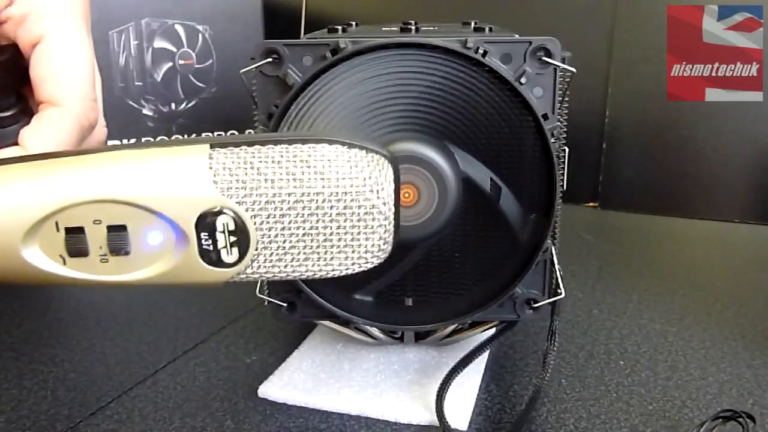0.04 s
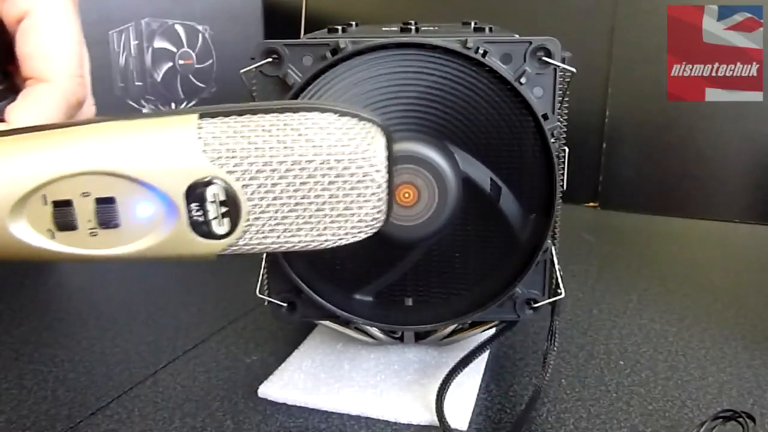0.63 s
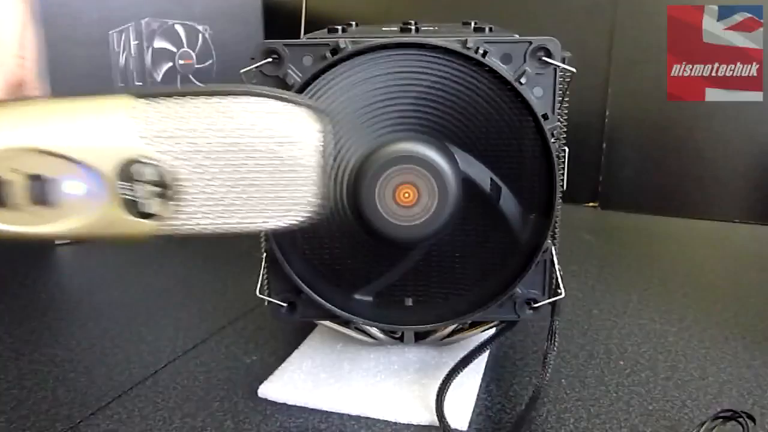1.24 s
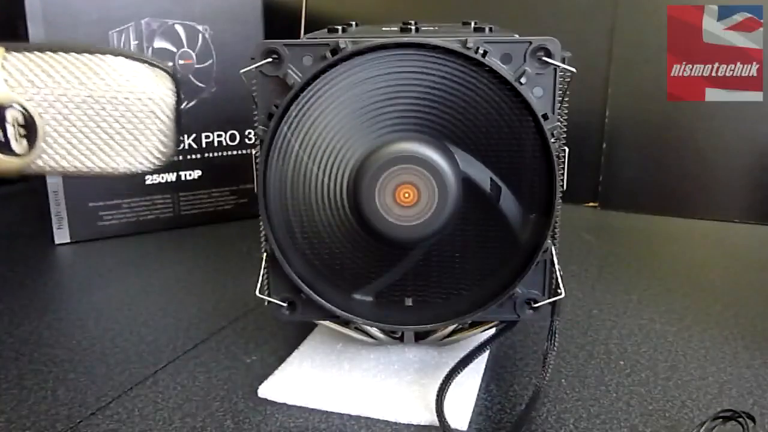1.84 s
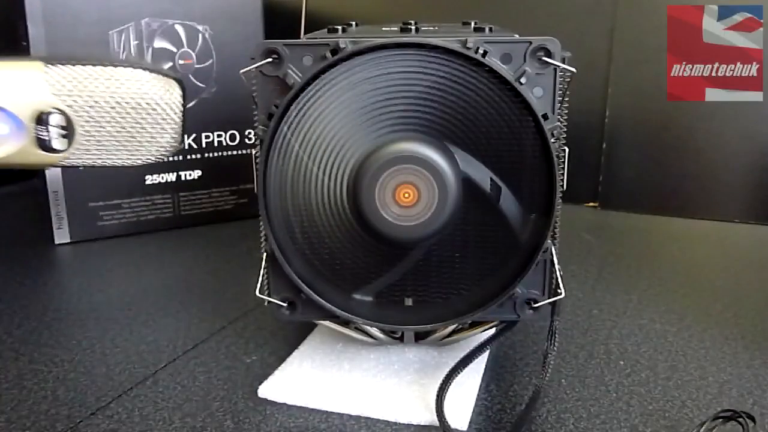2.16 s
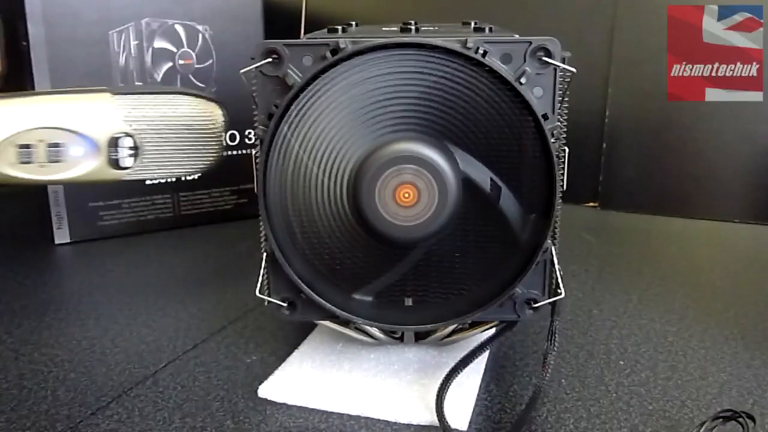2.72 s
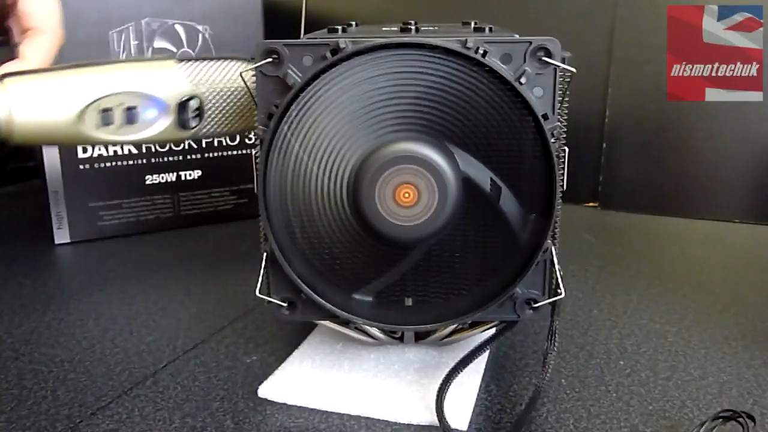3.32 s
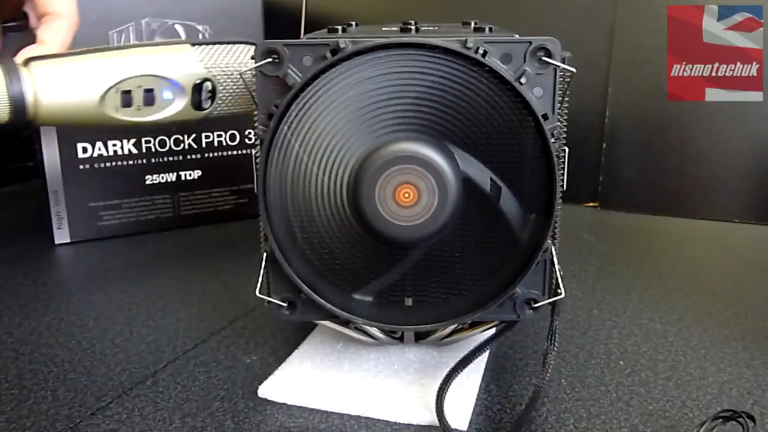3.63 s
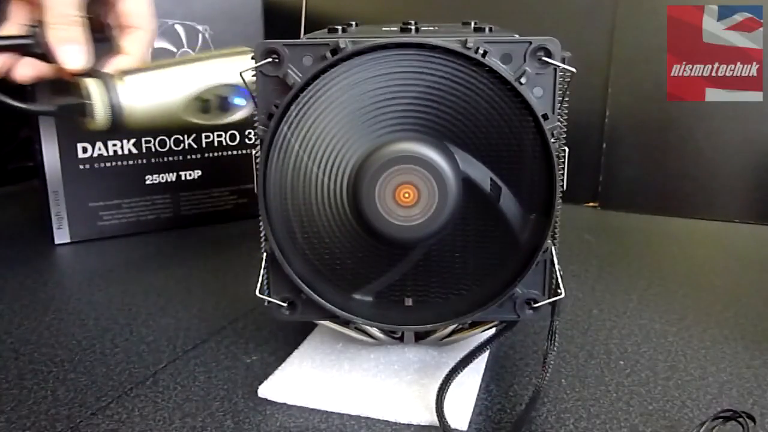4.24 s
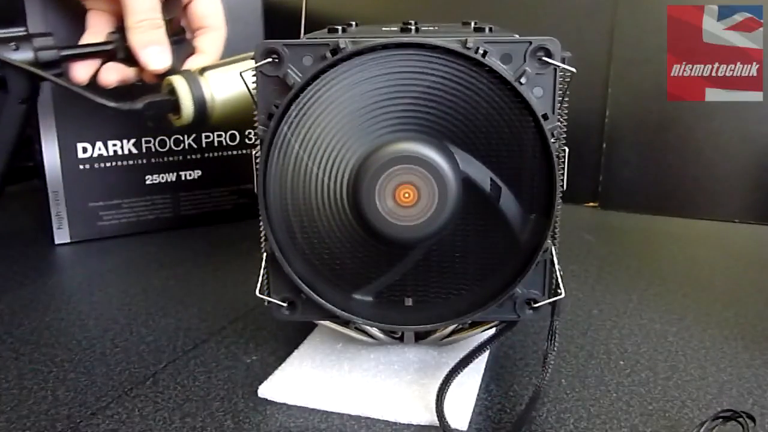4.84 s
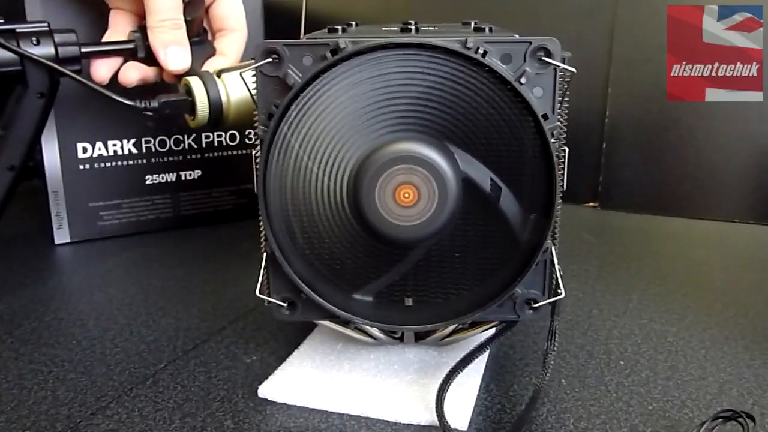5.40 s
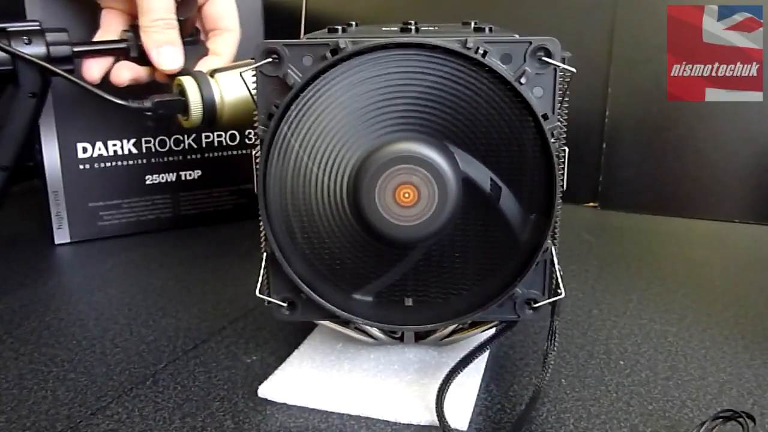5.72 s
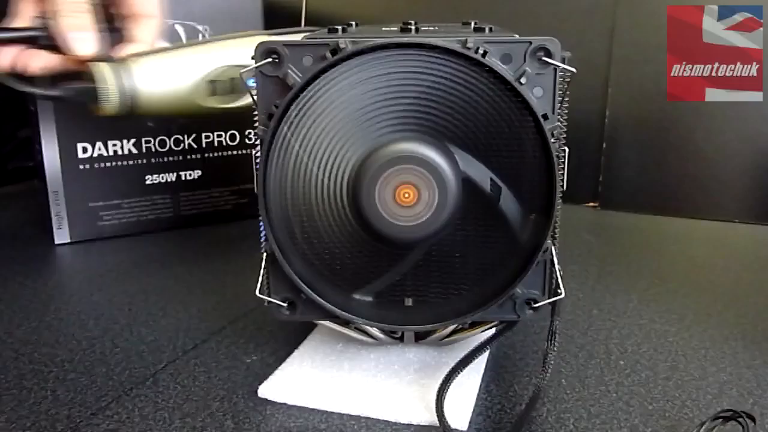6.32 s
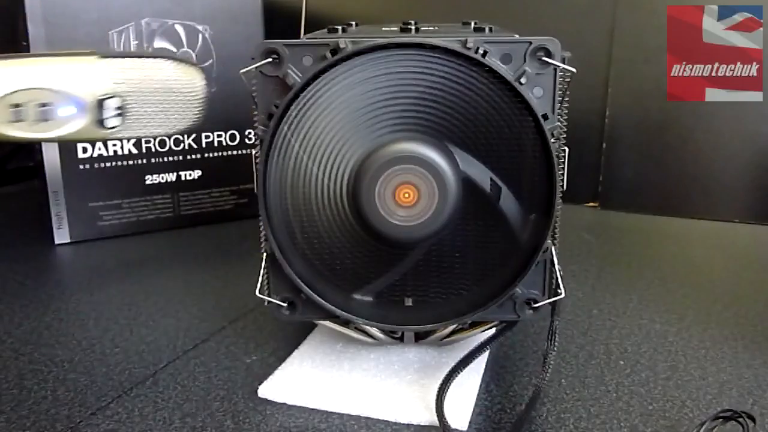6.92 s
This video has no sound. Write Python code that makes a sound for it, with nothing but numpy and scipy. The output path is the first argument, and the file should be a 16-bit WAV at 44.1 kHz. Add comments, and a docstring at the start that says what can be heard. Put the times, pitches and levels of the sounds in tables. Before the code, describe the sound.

Two computer fans spin at full speed on a cooler indoors, making a steady low hum with a soft rush of air. A close hand-held microphone moves from the front to the side, and the hum swells briefly, then recedes. Escaping air starts buffeting the microphone with a deep, gusty rumble that becomes the loudest sound. Faint high electronic whine and thin whistles from the microphone grille sit behind it.

```python
"""Two fans on a tower cooler hum at full speed as their blades chop the air.
Air swirls at the blades and rushes through the fins. A hand-held microphone moves from the
front fan round to the side, where escaping air buffets it and whistles in its wire grille.
Behind this are the faint whines of the motors, their drive and a power supply,
one tiny handling tick and a steady hiss."""
import sys
import numpy as np
from scipy.fft import rfft, irfft, next_fast_len
from scipy.io import wavfile
from scipy.ndimage import uniform_filter1d, map_coordinates

SR = 44100
rng = np.random.default_rng(int(sys.argv[2]) if len(sys.argv) > 2 else 0)


def file_out(sig):
    """Save sig as 16-bit WAV at sys.argv[1]."""
    # one column per channel
    cols = np.atleast_2d(sig).T
    # limit, then scale
    lim = np.clip(cols, -1, 1)
    pcm = np.round(lim * 32767).astype(np.int16)
    wavfile.write(sys.argv[1], SR, pcm)


N = 306611

# The front fan's hum, fading as the microphone leaves its face: time_s, level_db
FRONT_HUM = [(0, -31.5), (.55, -36.5), (1.05, -32.5), (1.5, -23.5), (1.8, -31), (2.15, -36.5), (2.45, -50),
             (4, -50.5), (6.95, -51.5)]
# Dead spots, where direct and reflected hum cancel: middle_s, length_s, change_db
FRONT_DEAD_SPOTS = [(1.94, 0.15, -14)]
# The rise and fall that both overtones follow: time_s, level_db
FRONT_OVERTONES = [(0, -43), (1, -43), (1.25, -40), (1.6, -43), (1.8, -60.5), (6.95, -66)]
# Low tones of the spinning rotor: cycles_per_turn, relative_db
ROTOR_TONES = [(1, -16), (2, -14.5), (3, -11.5), (4, -16), (5, -26.5), (6, -28)]
# How strongly the air stirs at the blades: time_s, level_db
BLADE_AIR = [(0, -45.5), (1, -45.5), (1.35, -42.5), (1.7, -51.5), (2.3, -52.5), (2.95, -48.5),
             (3.65, -47.5), (4.1, -53.5), (6.95, -51.5)]
# Tone colour of that swirling air: pitch_hz, relative_db
SWIRL_COLOUR = [(15, 1), (60, -5), (160, 1.5), (230, -4.5), (300, -8), (370, -7.5), (450, -13.5),
                (550, -12.5), (650, -15), (900, -22.5), (1300, -22), (1700, -34.5), (3000, -40),
                (8000, -77)]

def front_fan(turns_hz=26.9, blades=7):
    """Blades chop uneven air, so their hum flutters; close up, each turn of the rotor is felt too."""
    hum_db = curve(FRONT_HUM) + swells(FRONT_DEAD_SPOTS)
    overtone_db, air_db = curve(FRONT_OVERTONES), curve(BLADE_AIR)
    shaft = turning(turns_hz * (1 + 0.0012 * wobble(1.95)))
    blade = blades * shaft
    hum = amp(hum_db - 1.4 + 0.67 * wobble(30)) * tone(blade + 0.13 * wobble(35))
    throb_db = 2 * np.cos(2 * np.pi * seconds_since(1.206) / 0.21)  # one throb every 0.21 s
    # Several blades in a row cut each eddy (a small whirl of air), which smears the overtones.
    second = amp(overtone_db - 3 + throb_db + 2.4 * wobble(25)) * tone(2 * blade + 0.6 * wobble(35))
    third = amp(overtone_db - 13.5 + 1.3 * wobble(22)) * tone(3 * blade + 2.7 * wobble(25))
    rotor = amp(air_db + 13.5) * shaft_tones(shaft, ROTOR_TONES)
    swirl = amp(air_db + 8.5) * noise(SWIRL_COLOUR)
    return hum + second + third + rotor + swirl


# The rear fan's hum: time_s, level_db
REAR_HUM = [(0, -42), (.45, -39), (1.2, -42.5), (2.3, -39.5), (2.9, -33), (4.1, -39.5), (5.6, -34.5),
            (6.5, -37.5), (6.95, -43.5)]
# Dead spots in that hum: middle_s, length_s, change_db
REAR_DEAD_SPOTS = [(1.75, 0.65, -15), (3.33, 0.29, -10.5), (3.68, 0.35, -10), (6.92, 0.33, -10)]
# The tone of its nine blades, and overtones: cycles_per_turn, relative_db
REAR_TONES = [(9, 0.5), (18, -19), (27, -28), (36, -31.5)]
# Its motor's tone swells at the cooler's side: middle_s, length_s, boost_db
COGGING_SWELL = [(3.15, 0.84, 12.5)]

def rear_fan(turns_hz=22.91):
    """The slower fan hums, and its motor's magnets tug twelve times a turn (called cogging)."""
    hum_db = curve(REAR_HUM) + swells(REAR_DEAD_SPOTS)
    shaft = turning(turns_hz * (1 + 0.00046 * wobble(2.01)))
    hum = amp(hum_db + 0.55 * wobble(12)) * shaft_tones(shaft, REAR_TONES)
    cogging = amp(-60 + swells(COGGING_SWELL)) * tone(12 * shaft)
    return hum + cogging


# Air through the fins, louder beside the cooler: time_s, level_db
FIN_AIR = [(0, -58.5), (1.6, -59), (2.3, -53.5), (3.6, -49.2), (5.5, -47), (6.7, -48.2), (6.95, -52)]
# Tone colour of that air: pitch_hz, relative_db
FIN_COLOUR = [(100, -7), (300, -3), (550, 1), (950, 1.5), (1120, -2.5), (1700, -0.5), (2300, -5.5),
              (3000, -10), (3700, -13.5), (4500, -17.5), (5500, -23.5), (7500, -29.5), (10000, -38),
              (16000, -43)]
# Tones heard through the fins: pitch_hz, relative_db
LEAKING_TONES = [(618.6, -14), (700, -18.5), (824.8, -16), (959, -22.5), (1856, -18)]

def fin_rush():
    """The rear fan drives air through the fins, and its high overtones leak out with that air."""
    overtones = sum(amp(db + 2.1 * wobble(3.5)) * tone(turning(hz * (1 + 0.000712 * wobble(6))))
                    for hz, db in LEAKING_TONES)
    rush = amp(4.5 + 0.39 * wobble(14)) * noise(FIN_COLOUR)
    return amp(curve(FIN_AIR)) * (rush + overtones)


# Wind on the microphone, strongest at the cooler's side: time_s, level_db
WIND = [(0, -44), (1.3, -37.5), (1.8, -41.5), (2.5, -38.5), (2.85, -24), (3.35, -29.5), (4.05, -23),
        (4.7, -21.5), (5.3, -17), (6.1, -22), (6.75, -20.5), (6.95, -27)]
# Tone colours of large and of small eddies: pitch_hz, relative_db
LARGE_EDDY_COLOUR = [(5, -21), (12, 1.5), (30, 4.5), (50, 2.5), (70, -8.5), (100, -20), (150, -35.5),
                     (220, -54), (400, -81), (1500, -140)]
SMALL_EDDY_COLOUR = [(20, -21), (50, 8), (75, 1), (100, -0.5), (130, -10.5), (170, -21), (240, -23),
                     (400, -50.5), (900, -77), (3000, -140)]

def draught():
    """Eddies push on the microphone: small ones at the intake, mostly large ones in the escaping air."""
    steady = amp(curve(WIND) + 0.4 * wobble(19))
    intake = amp(curve(BLADE_AIR) + 5.5) * (1 - past_rim(middle_s=1.8, length_s=0.3))
    quick = np.hypot(intake, amp(-13.5) * steady)
    return steady * eddies(LARGE_EDDY_COLOUR) + quick * eddies(SMALL_EDDY_COLOUR)


# Gusts in the escaping air: middle_s, length_s, level_db, pitch_ratio
WIND_GUSTS = [(2.982, 0.14, -30, 1.54), (3.58, 0.346, -22.5, 1.85), (3.806, 0.26, -16, 1.19),
              (4.413, 0.11, -19.5, 1.55), (4.982, 0.21, -15, 0.91), (5.232, 0.23, -14.5, 1.26),
              (5.517, .16, -10.5, 1.18), (5.818, 0.1, -13.5, 1.07), (6.35, 0.19, -15.5, 1.01),
              (6.66, 0.22, -25, 1.9)]

def gust(middle_s, length_s, level_db, pitch_ratio):
    """One swell of wind; faster air carries its eddies past sooner, so they sound higher."""
    colour = [(hz * pitch_ratio, db) for hz, db in LARGE_EDDY_COLOUR]
    return swells([(middle_s, length_s, amp(level_db))]) * eddies(colour)


# Grille whistles: middle_s, length_s, pitch_hz, glide_hz_per_s, level_db, tremble_share
GRILLE_WHISTLES = [(3.3, .11, 8080, -600, -70, 0.0046), (3.49, .12, 8020, -300, -68, .003),
                   (3.62, .1, 8000, 2201, -70, .003), (3.69, .08, 6570, 3998, -71, .008),
                   (6.571, 0.17, 7930, 901, -58.5, 0.0027), (6.733, .25, 8000, -400, -67, .004),
                   (6.78, 0.4, 6550, -1500, -72, .016), (6.93, .1, 7930, -500, -69, .005)]

def whistle(middle_s, length_s, pitch_hz, glide_hz_per_s, level_db, tremble_share):
    """Whirls of air peel off the grille's wires in a thin, trembling tone that goes flat as it weakens."""
    fade_s, sag_hz = 0.049, 109.3
    t = seconds_since(middle_s)
    blow = np.clip((length_s / 2 - np.abs(t)) / fade_s + 0.34, 0, 1)
    hz = pitch_hz + glide_hz_per_s * np.clip(t, -length_s, length_s) + sag_hz * (blow - 1)
    gain = blow * amp(level_db + 2 * wobble(70))
    return gain * tone(turning(hz * (1 + tremble_share * wobble(300))))


# Moments when the air grazes the grille: middle_s, length_s, level_db
GRILLE_GRAZES = [(4.76, .36, -67.5), (5.25, 0.51, -61), (6.8, 0.48, -65.5)]
# Tone colour of the grille's hiss: pitch_hz, relative_db
GRILLE_COLOUR = [(3500, -27), (5600, -5), (6400, 1), (7000, -3), (7900, -4.5), (8600, -12), (9300, -10),
                 (10200, -12), (16000, -29)]

def grille_hiss():
    """The jet of air hisses as it brushes the wire mesh."""
    gain = swells([(middle_s, length_s, amp(db)) for middle_s, length_s, db in GRILLE_GRAZES])
    return gain * noise(GRILLE_COLOUR)


# The motor drive's whine: time_s, level_db
DRIVE_LEVEL = [(0, -71), (2.2, -74.5), (3.9, -70), (4.5, -63.5), (5.3, -60), (6.05, -61), (6.3, -67.5),
               (6.95, -71)]
# Loud spots, where its echoes add up: middle_s, length_s, boost_db
DRIVE_LOUD_SPOTS = [(.56, .42, 6), (1.89, 0.32, 13), (2.77, 0.058, 7), (3.3, .1, 5), (4.2, .18, 7),
                    (4.63, .16, 5.5), (5.03, 0.26, 5), (6.4, .17, 6.5)]
# Its tones, in steps of the switching rate: steps_from_centre, front_db, side_db
DRIVE_TONES = [(-4, -21, -11), (-2, -16, -11), (-1, -17, -5.5), (0, 3.5, -2), (1, -8, -5.5), (38, -22, -22)]

def drive_whine(centre_hz=11063, switching_hz=103.1):
    """Switching the motor's coils adds tones around the drive's whine; echoes make each one flicker."""
    whine_db = curve(DRIVE_LEVEL) + swells(DRIVE_LOUD_SPOTS)
    beside = curve([(0, 0), (4.2, 0), (5.1, 0.7), (5.4, 1), (6.1, 1), (6.35, 0)])  # 1 = side balance
    echo_gain = 0.39 * (1 - 0.6 * beside)
    centre, switching = turning(centre_hz + 4 * wobble(12)), turning(switching_hz)
    tones = np.zeros(N)
    for steps, front_db, side_db in DRIVE_TONES:
        phase = centre + round(steps) * switching + 0.73 * echo_drift()
        echo = wobble(24) * tone(phase) + wobble(32) * tone(phase + np.pi / 2)
        tones += amp(front_db + beside * (side_db - front_db)) * (tone(phase) + echo_gain * echo)
    return amp(whine_db - 4) * tones


# The motor's ringing tones: pitch_hz, level_db
MOTOR_TONES = [(2267, -74), (2475, -70), (2503, -66.5), (2528, -71), (2680, -72)]

def motor_ring():
    """Thin, wavering motor tones escape sideways, heard once the microphone is past the fan's rim."""
    tones = sum(amp(db + 2.3 * wobble(14)) * tone(turning(hz * (1 + 0.00304 * wobble(60))))
                for hz, db in MOTOR_TONES)
    return past_rim(middle_s=2.05, length_s=0.36) * tones


# The supply's sizzle, partly blocked by the cooler's corner: time_s, level_db
SIZZLE_LEVEL = [(0, -67), (2, -68), (2.5, -71), (3.9, -73), (4.4, -68.5), (6, -70), (6.95, -72)]
# Tone colour of that sizzle: pitch_hz, relative_db
SIZZLE_COLOUR = [(10900, 1.5), (11400, 0), (12300, -1.5), (12850, 0.5), (13100, -2.5)]

def power_supply(mains_hz=50.05):
    """Mains ripple sweeps the supply's high tone up and down; echoes off desk and walls add and cancel."""
    ripple = np.abs(np.sin(turning(mains_hz)))
    sweep = tone(turning(10950 + 2130 * ripple + 2.5 * wobble(7)))
    delays = rng.integers(0, SR // 100, size=7)  # seven paths, up to 10 ms late
    strengths = np.array([echo_drift() for _ in delays])
    shares = strengths / np.linalg.norm(strengths, axis=0)
    echoes = sum(share * np.roll(sweep, delay) for share, delay in zip(shares, delays))
    sizzle = filtered(echoes, lambda hz: amp(np.interp(hz, *np.transpose(SIZZLE_COLOUR))))
    return amp(curve(SIZZLE_LEVEL)) * unit(sizzle)


# Speed of the hand, which slows in front and at the side: time_s, echo_spots_per_s
HAND_SPEED = [(0, 2.5), (.9, 2.2), (1.4, 10), (2.8, 10.5), (5, 3), (5.9, 2.5), (6.5, 10)]

def echo_drift():
    """An echo changes at random as the microphone is carried through loud and quiet spots."""
    travel = np.cumsum(np.clip(curve(HAND_SPEED), 0, 20)) / SR
    return map_coordinates(rng.standard_normal(160), [travel])


def handling_tick(start_s, peak_db, pitch_hz, width_hz, decay_s):
    """One tiny bright tick as the microphone is turned in the hand."""
    age = np.maximum(seconds_since(start_s), 0)
    burst = rng.standard_normal(N) * (age > 0) * amp(-60 * age / decay_s)
    ring = filtered(burst, lambda hz: 1j * hz * width_hz / (pitch_hz**2 - hz**2 + 1j * hz * width_hz))
    return amp(peak_db) * ring / np.abs(ring).max()


# Tone colour of the background hiss: pitch_hz, relative_db
HISS_COLOUR = [(20, -3), (7500, 2.5), (9000, -2), (12500, 5), (14000, -7), (15200, 2), (16000, 1)]

def background_hiss():
    """A faint, steady hiss lies under everything."""
    return amp(-67) * noise(HISS_COLOUR)


def amp(db):
    """Turn decibels into a gain."""
    return 10 ** (np.asarray(db) / 20)


def unit(x):
    """Scale to an average strength (rms) of 1."""
    return x / np.sqrt(np.mean(x ** 2) + 1e-20)


def seconds_since(start_s):
    """The time at each sample, counted from start_s."""
    return np.arange(N) / SR - start_s


def curve(rows):
    """Join (time_s, value) points with straight lines."""
    return np.interp(seconds_since(0), *np.transpose(rows))


def swells(rows):
    """Add up bell-shaped swells, each length_s wide at half its height."""
    return sum(height * 0.5 ** ((2 * seconds_since(middle_s) / length_s) ** 2)
               for middle_s, length_s, height in rows)


def past_rim(middle_s, length_s):
    """0 in front of the fan, 1 once the microphone has moved past its rim."""
    return np.clip(seconds_since(middle_s) / length_s + 0.5, 0, 1)


def wobble(rate):
    """A smooth curve through `rate` random values a second."""
    return map_coordinates(rng.standard_normal(int(N * rate / SR) + 4), [np.arange(N) * rate / SR])


def turning(hz):
    """The growing angle (phase) of something that cycles hz times a second."""
    return 2 * np.pi * (np.cumsum(hz * np.ones(N)) / SR + rng.random())


def tone(phase):
    """A pure tone of strength 1."""
    return np.sqrt(2) * np.sin(phase)


def shaft_tones(shaft, rows):
    """Tones that cycle a whole number of times in each turn of a shaft."""
    return sum(amp(db) * tone(round(cycles) * shaft + 2 * np.pi * rng.random()) for cycles, db in rows)


def filtered(x, response):
    """Scale each frequency in x by response(hz)."""
    size = next_fast_len(N + SR // 2)
    return irfft(rfft(x, size) * response(np.fft.rfftfreq(size, 1 / SR)), size)[:N]


def noise(colour):
    """Noise of strength 1, shaped by (pitch_hz, relative_db) points."""
    pitch_hz, db = np.transpose(colour)
    white = rng.standard_normal(N)
    return unit(filtered(white, lambda hz: amp(np.interp(np.log(hz + 1), np.log(pitch_hz), db))))


def eddies(colour):
    """The rumble of whirling air, evened out so that draught and gusts set how hard it pushes."""
    push = noise(colour)
    power = uniform_filter1d(uniform_filter1d(push ** 2, size=SR // 12), size=SR // 40)
    return unit(push / np.sqrt(np.abs(power) + 0.03))


def scene():
    """Both fans, the air on the microphone, the electronics, a tick and a hiss, in one channel."""
    tick = handling_tick(start_s=6.358, peak_db=-49, pitch_hz=8500, width_hz=1200, decay_s=0.019)
    fans = front_fan() + rear_fan() + fin_rush() + motor_ring()
    wind = draught() + sum(gust(*row) for row in WIND_GUSTS)
    grille = sum(whistle(*row) for row in GRILLE_WHISTLES) + grille_hiss()
    electronics = drive_whine() + power_supply()
    return (fans + wind + grille + electronics + tick + background_hiss())[None]


def record(dry):
    """Cut the very highest treble."""
    return filtered(dry[0], lambda hz: hz < 15740)[None]


dry = scene()
out = record(dry)
file_out(out)
```